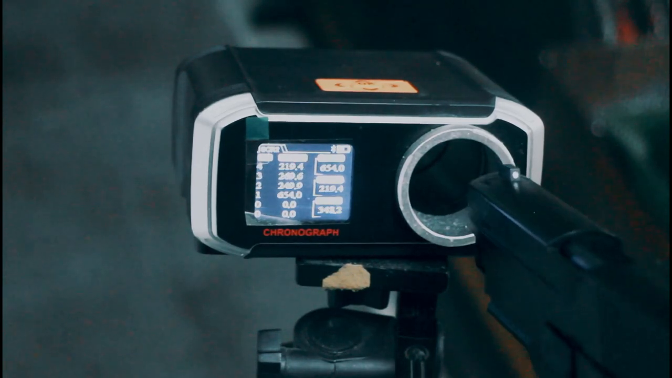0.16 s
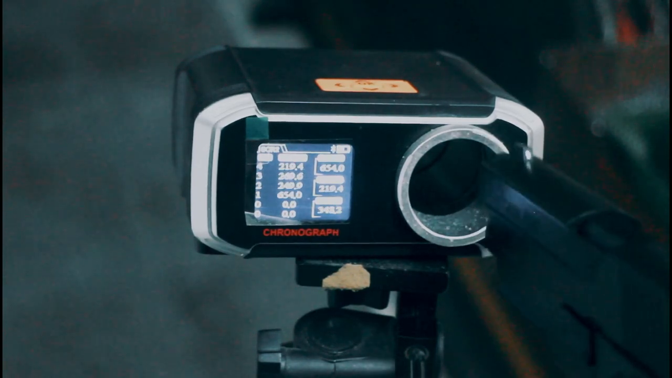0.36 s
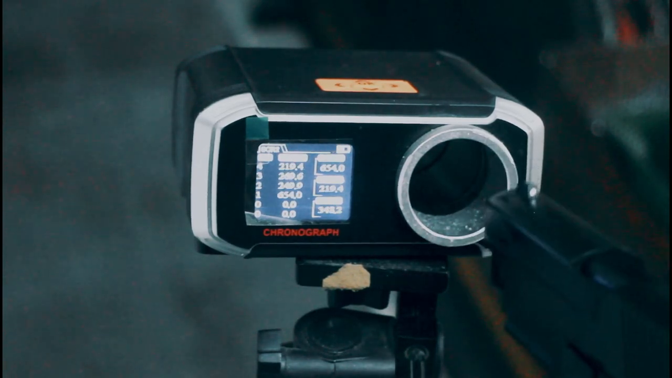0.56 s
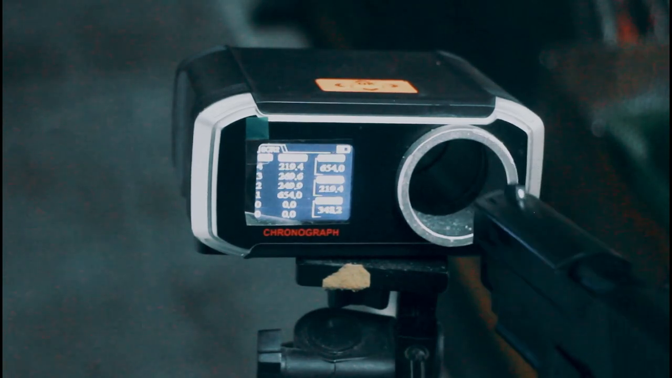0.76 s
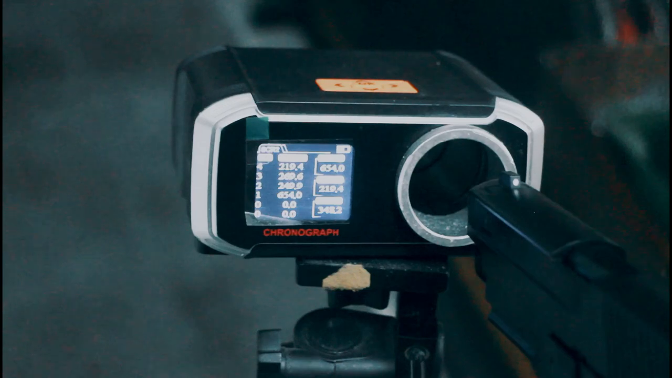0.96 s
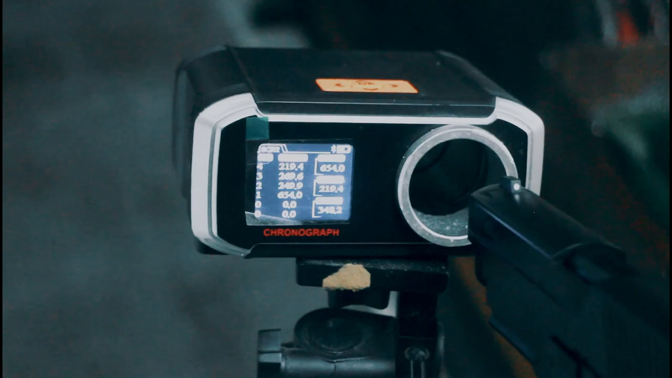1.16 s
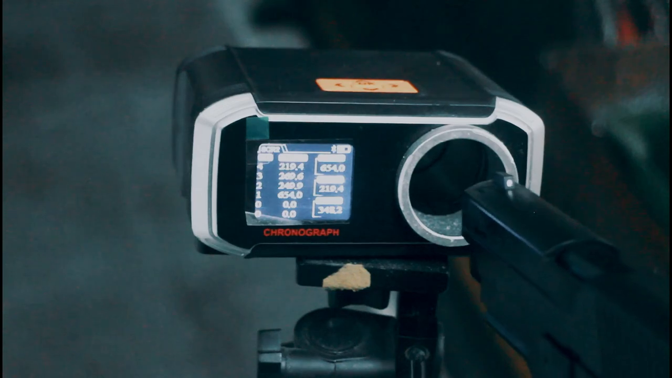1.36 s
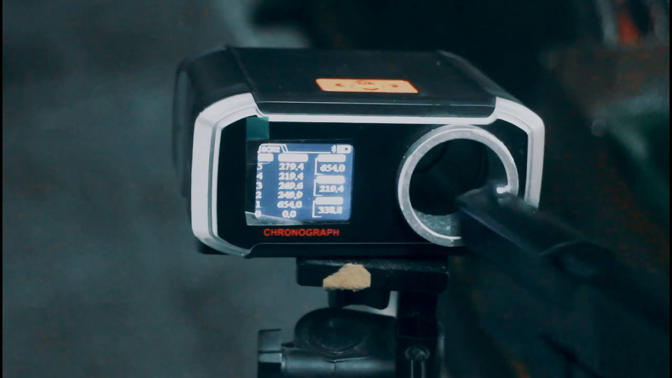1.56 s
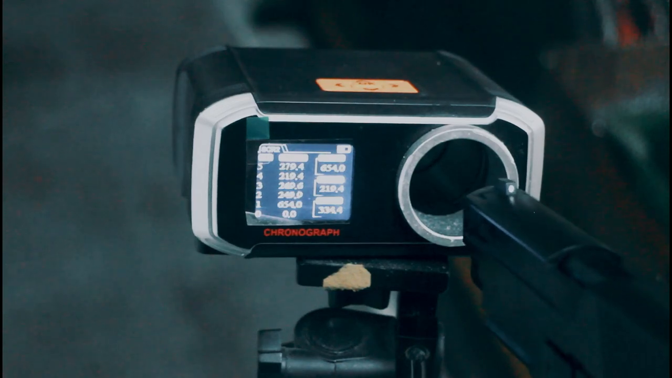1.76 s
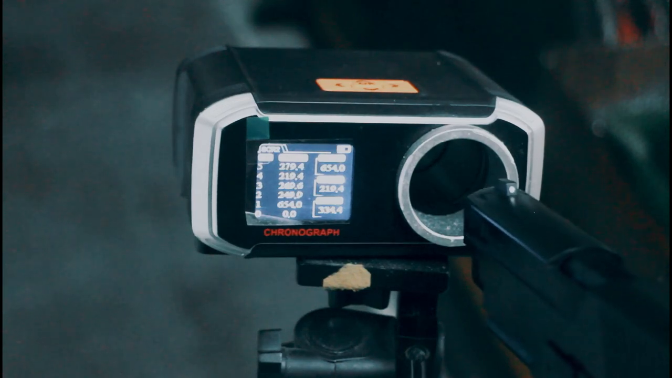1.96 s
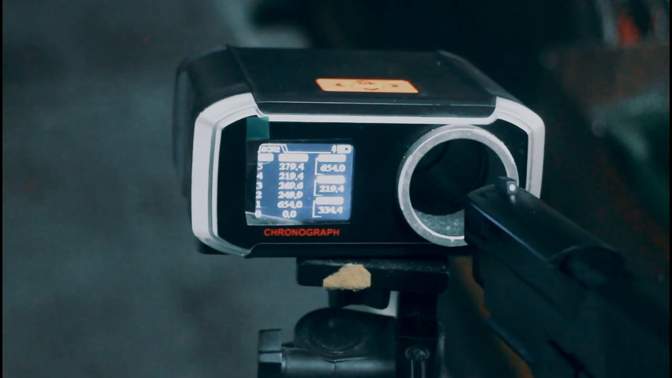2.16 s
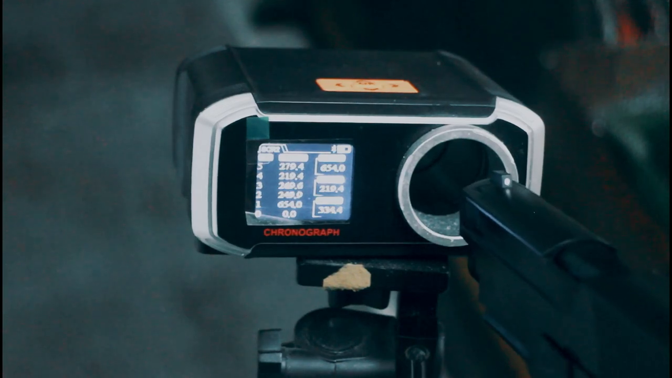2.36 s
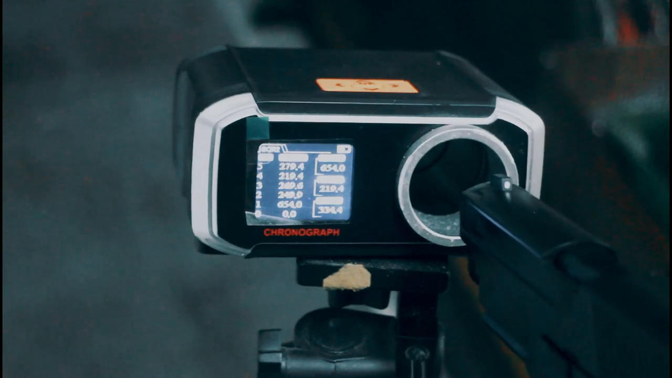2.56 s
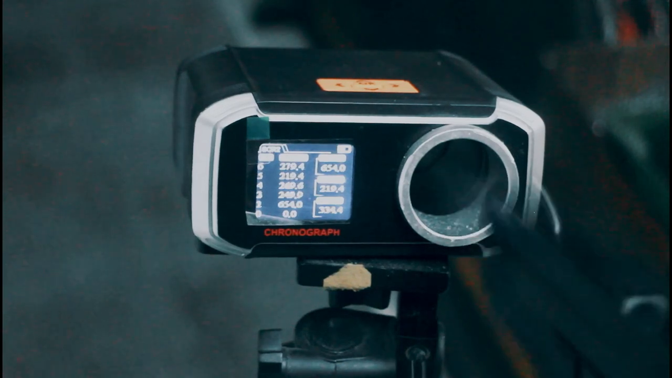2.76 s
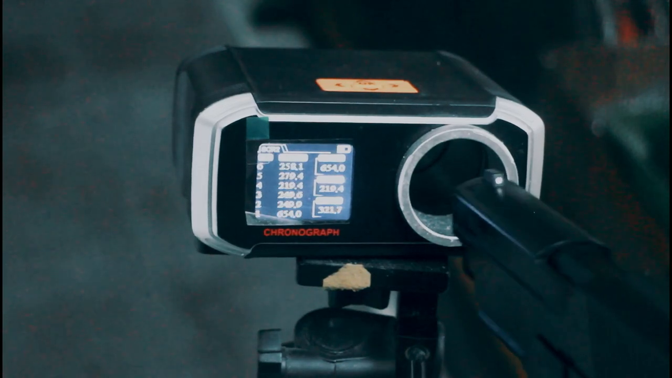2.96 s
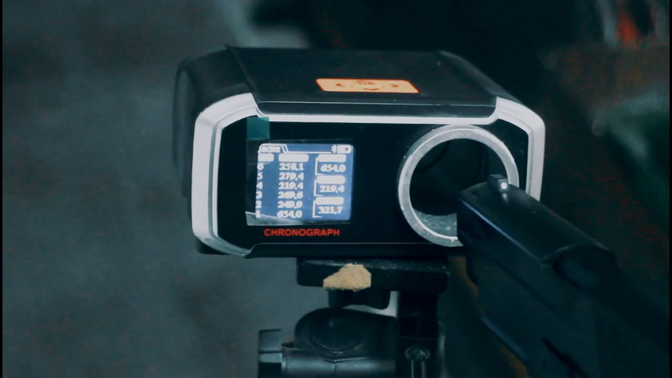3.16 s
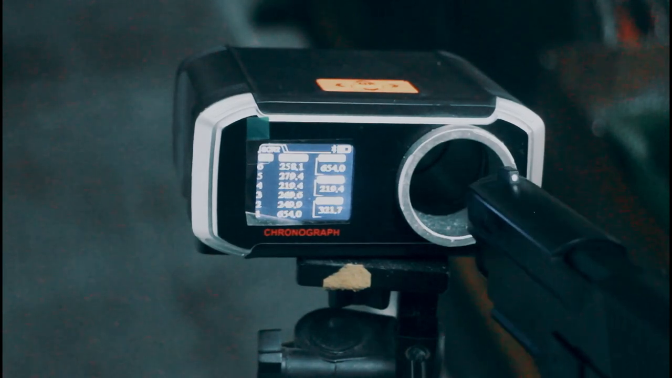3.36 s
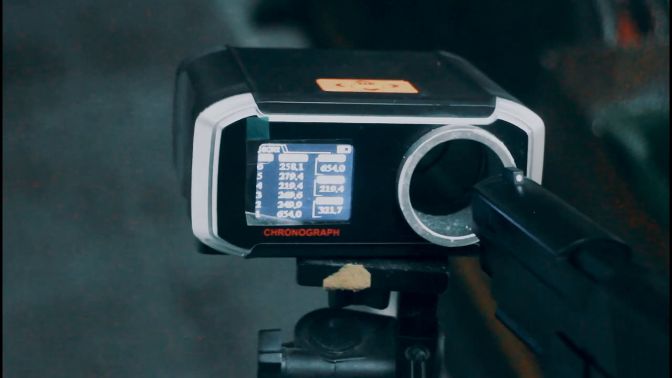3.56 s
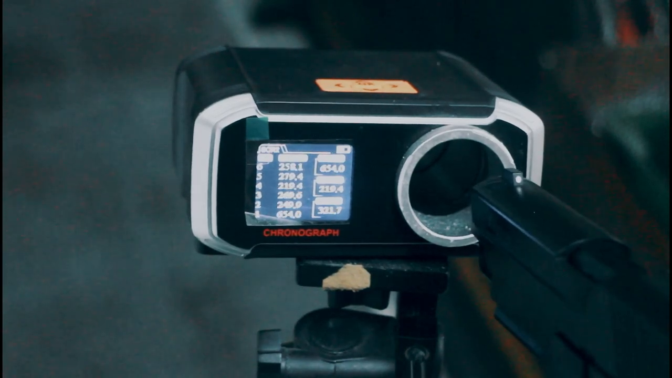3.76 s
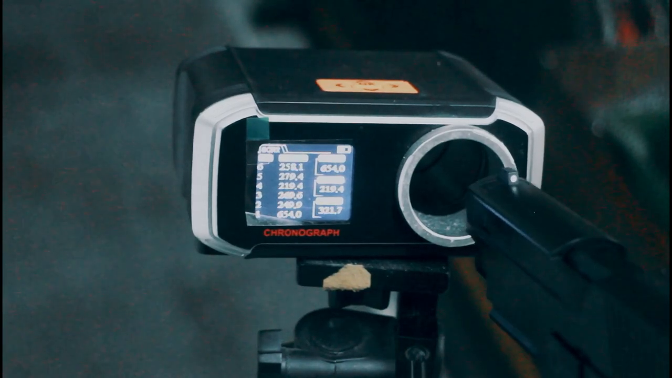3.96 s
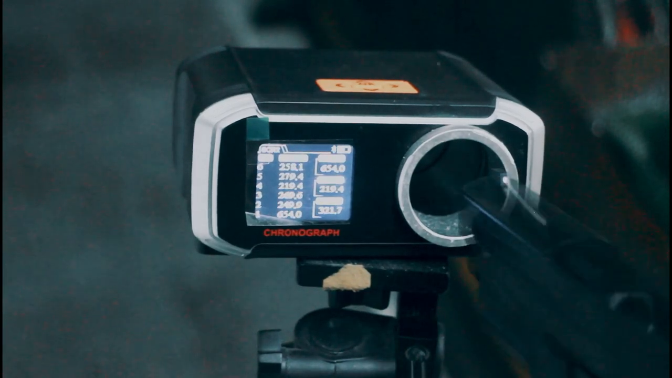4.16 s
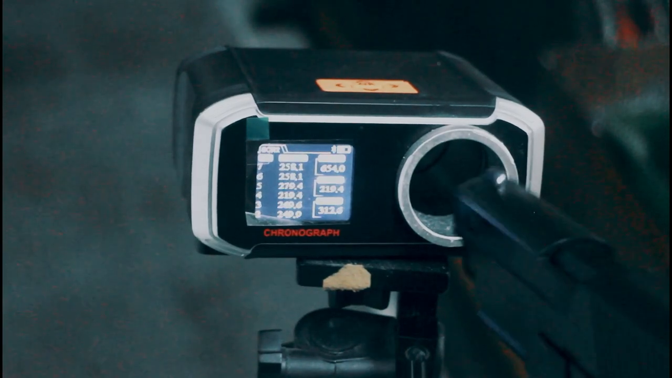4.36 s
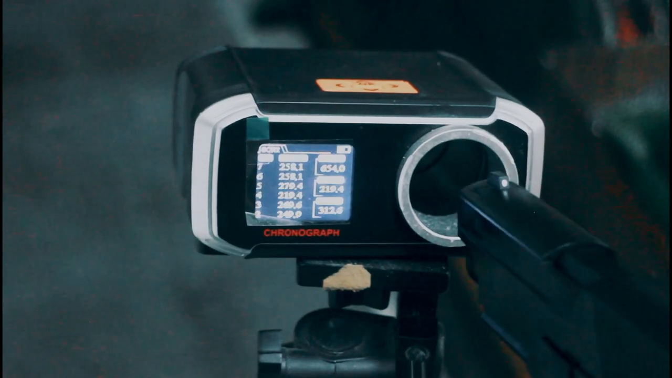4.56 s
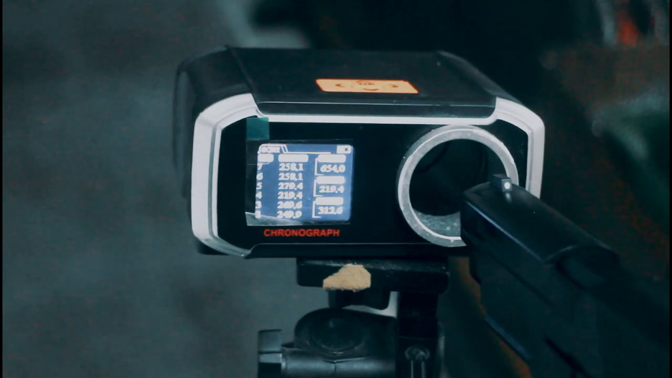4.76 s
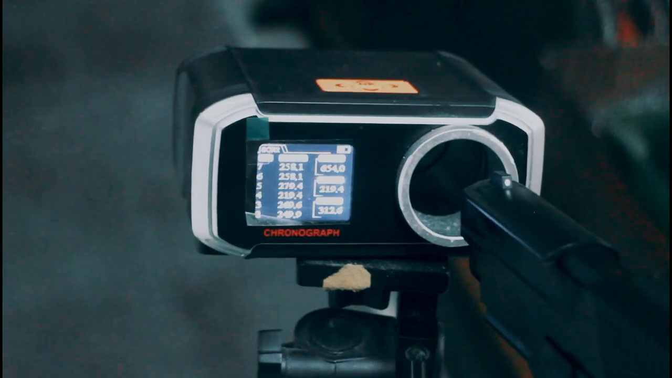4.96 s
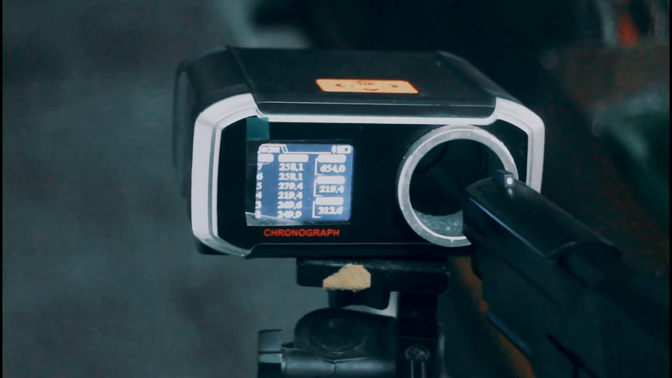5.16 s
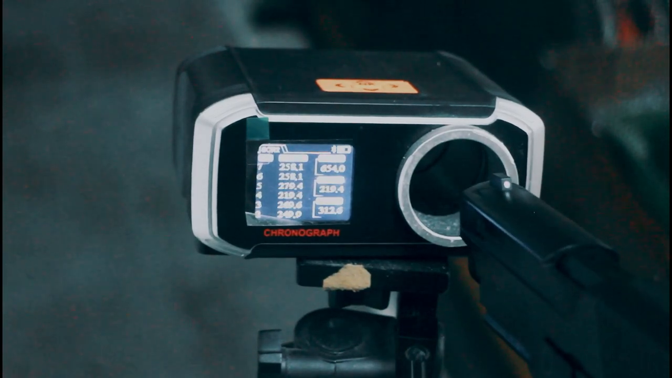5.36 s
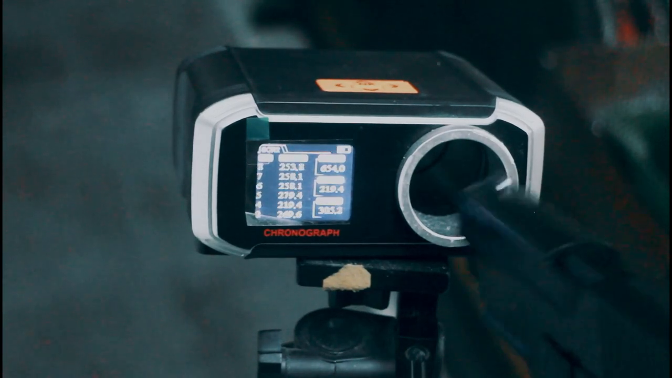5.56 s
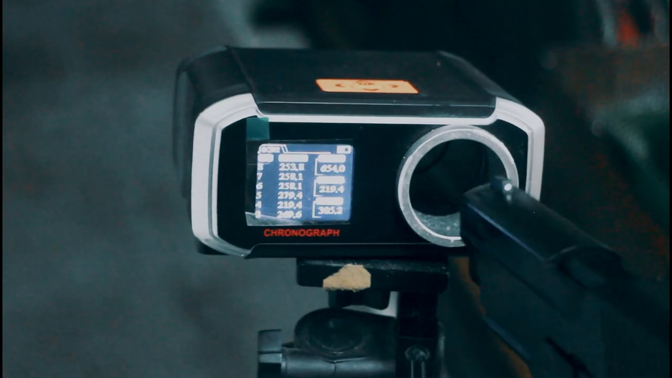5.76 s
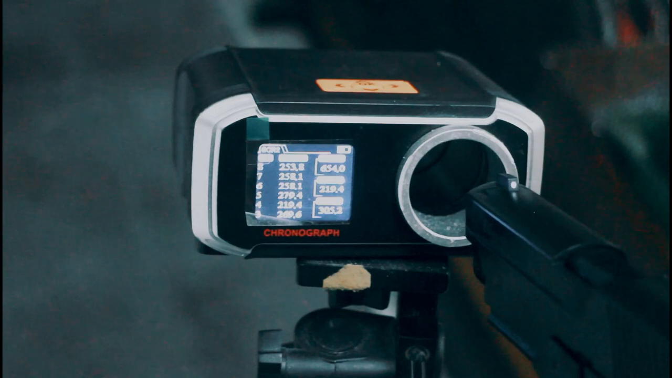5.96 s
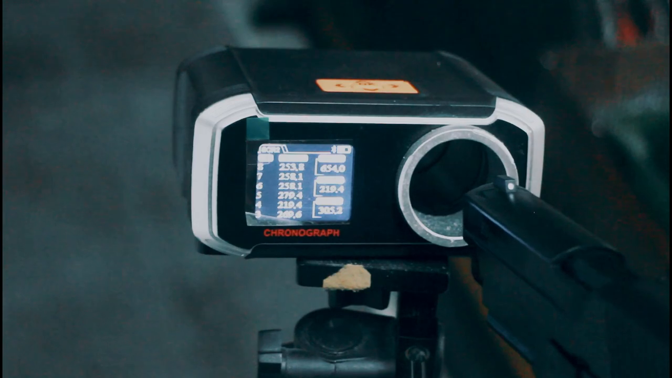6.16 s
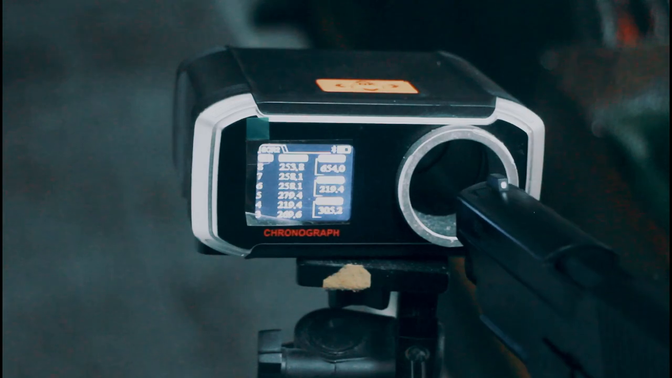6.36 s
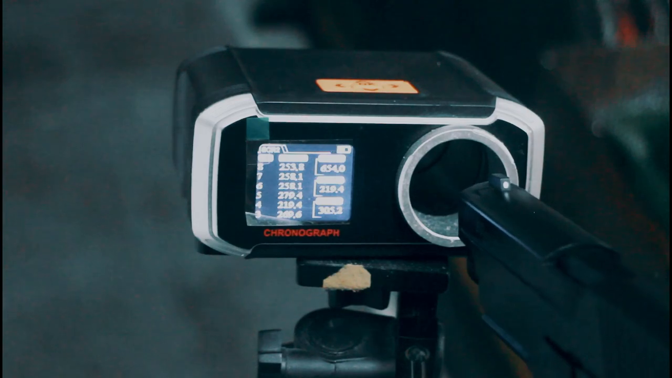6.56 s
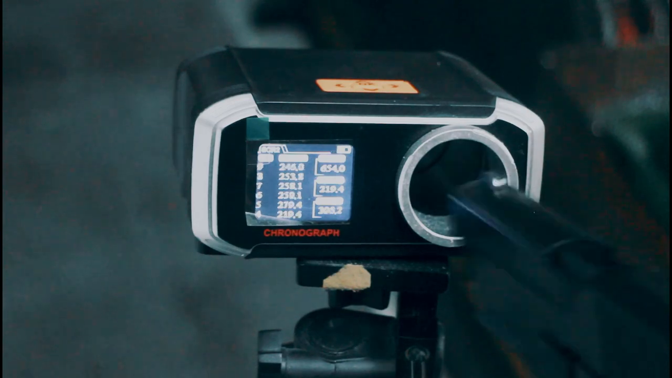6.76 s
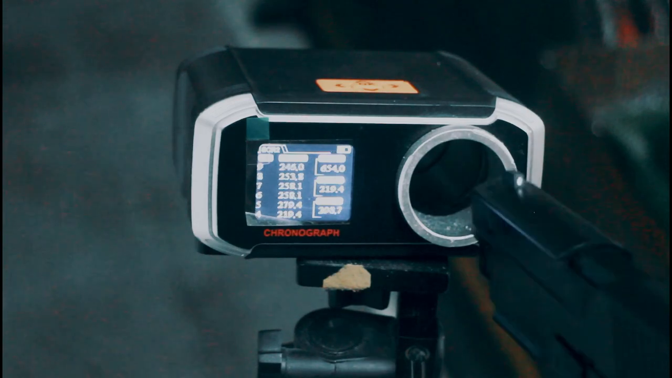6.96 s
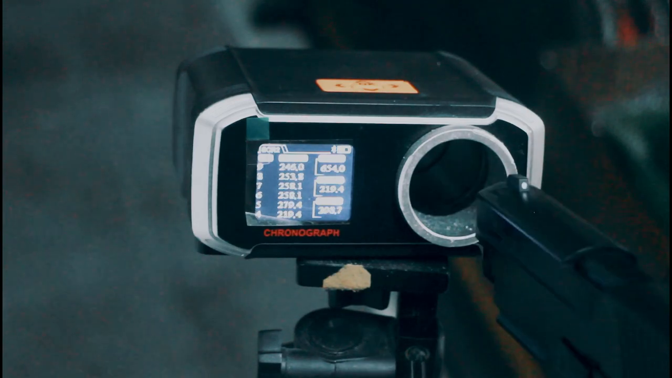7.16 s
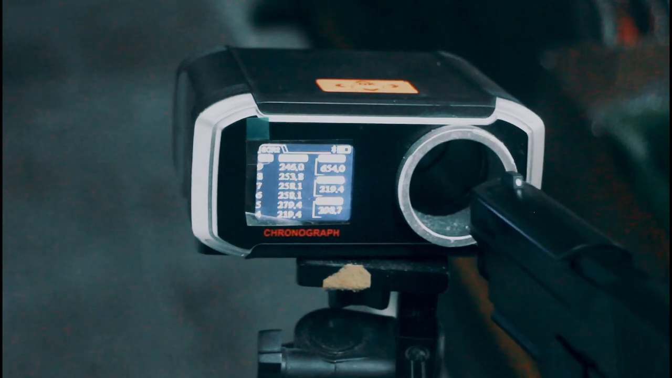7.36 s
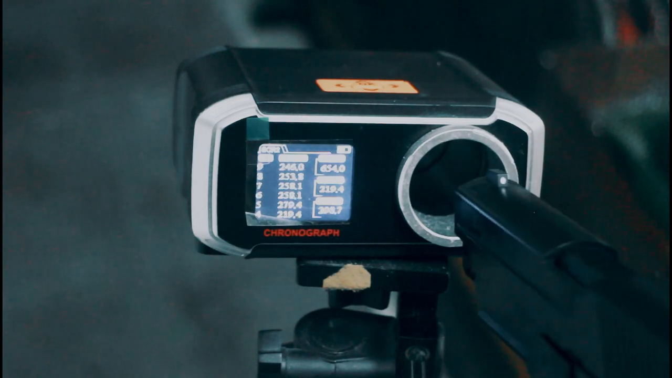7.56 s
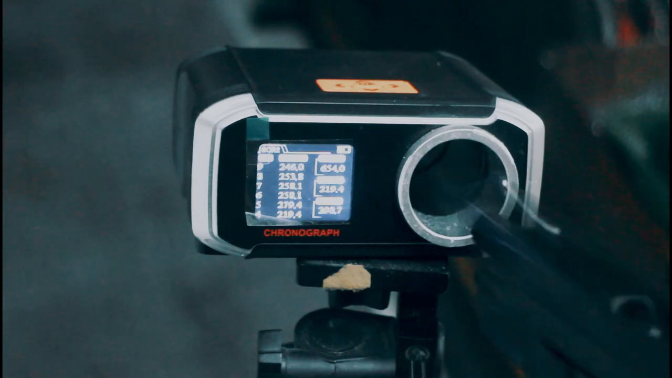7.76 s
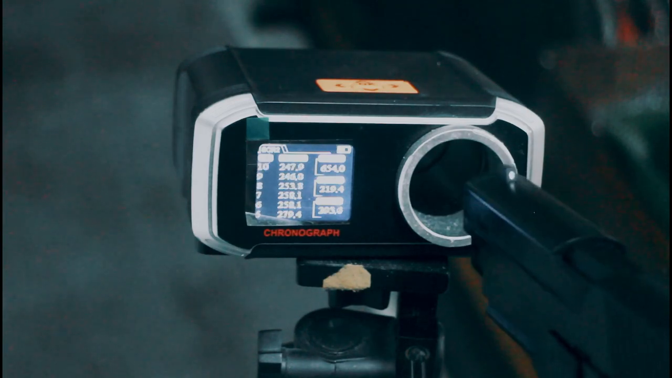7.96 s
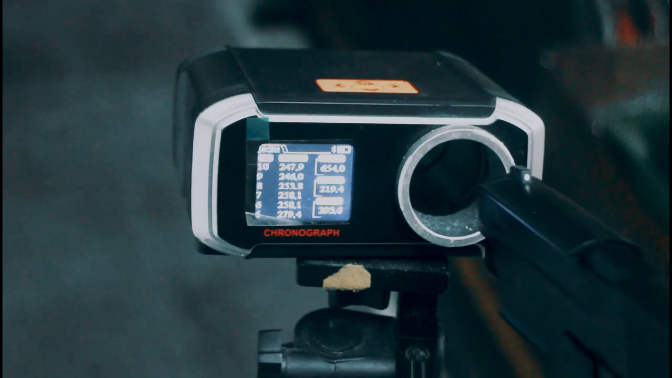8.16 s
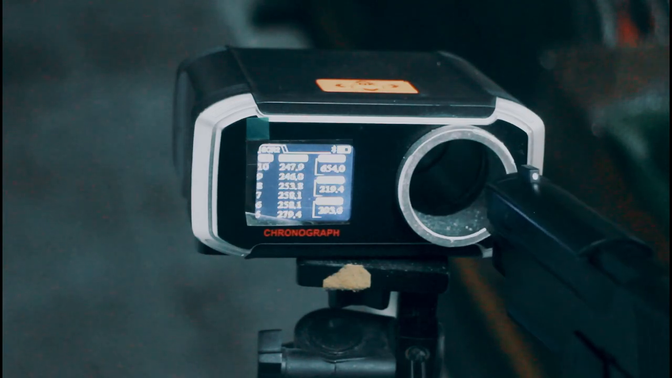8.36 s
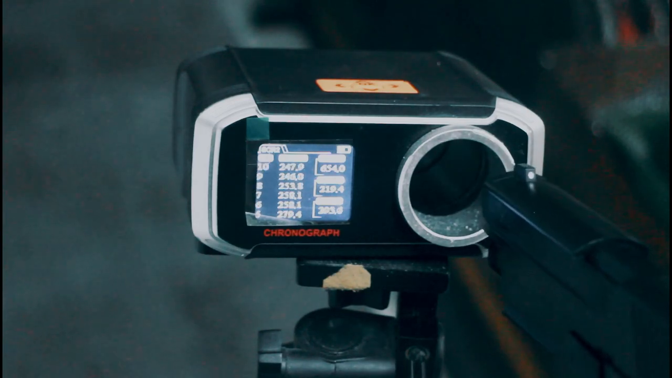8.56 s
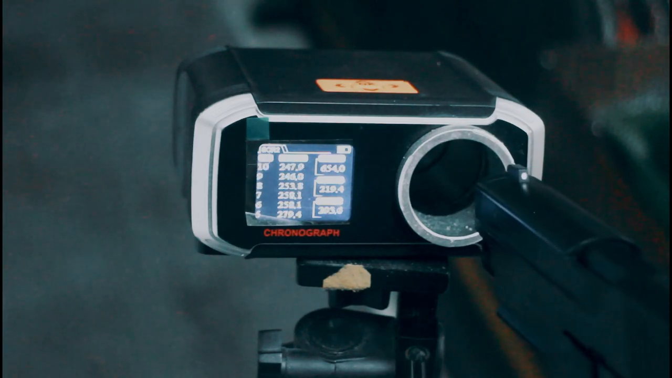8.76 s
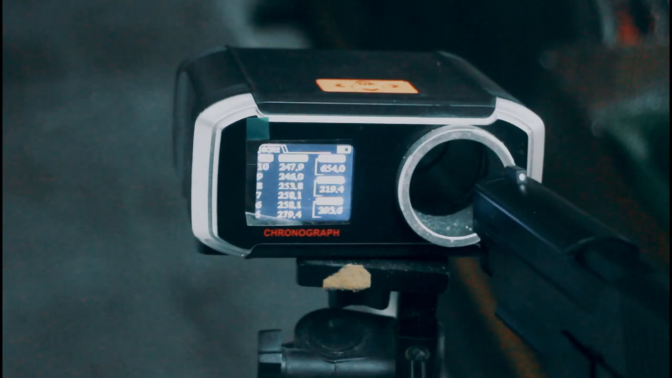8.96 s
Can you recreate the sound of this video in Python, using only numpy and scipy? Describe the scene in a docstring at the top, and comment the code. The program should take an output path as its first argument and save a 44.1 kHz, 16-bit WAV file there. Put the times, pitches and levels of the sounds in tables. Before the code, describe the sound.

Six loud cracks from a gas toy pistol echo in a hall, with faint ticks between the steady single shots.

```python
"""A gas blowback toy pistol, fired six times at a steady pace in a bare hall, close to a small stereo recorder.
Each shot is a valve hiss, a muzzle blast, then the slide hitting its rear stop and slamming home.
The hall rings for a second; at the start, the tail of an earlier shot is still dying away.
The blasts overload the recorder, whose gain control ducks and recovers.
Between shots: small trigger ticks, one hollow knock nearby, and a low murmur of ventilation."""
import sys
import numpy as np
from scipy import signal
from scipy.io import wavfile

SR = 44100
rng = np.random.default_rng(int(sys.argv[2]) if len(sys.argv) > 2 else 0)


def store_pcm(level_fs):
    """Save levels as 16-bit WAV."""
    pcm = np.round(np.clip(level_fs, -1, 1) * 32767).astype(np.int16)
    wavfile.write(sys.argv[1], SR, np.atleast_2d(pcm).T)


N = 396459

# Room tone. Each row: frequency in Hz, relative level per Hz in dB.
ROOM_TONE_SPECTRUM = [(15, -55), (25, -26), (64, -17.5), (137, -7), (165, -10), (269, -7.5), (403, -8),
                      (750, -6.5), (814, -6), (907, -7), (1430, -10.5), (2150, -16.5), (2330, -14.5),
                      (3060, -19.5), (15900, -29)]
# How alike the two capsules hear room tone and hall. Each row: frequency in Hz, correlation from -1 to 1.
ROOM_TONE_LIKENESS = [(60, 0.28), (130, 0.29), (290, 0.45), (640, -0.42), (1410, 0.12), (3100, -0.07),
                      (6820, -0.32), (15000, -0.53)]
HALL_CORRELATION = [(60, 0.95), (290, 0.98), (640, 0.99), (1410, .88), (3100, 0.75), (6820, .8),
                    (10000, 0.32), (11500, -.4), (15000, -.4)]
# Room tone and hall lean to the left. Each row: frequency in Hz, left minus right in dB.
LEFT_LEAN = [(60, 5), (110, 0.5), (200, 1), (380, 3), (700, 2.5), (1290, 2), (2380, 0.5), (4400, 0.0),
             (8120, 0), (15000, 2)]
# The hall's decay. Each row: frequency in Hz, seconds to fall 60 dB.
HALL_DECAY = [(100, 0.8), (260, 0.86), (700, 1.027), (1840, 1.051), (4850, 0.86), (10000, 0.68),
              (14000, .45)]
# The hall's colour. Each row: frequency in Hz, relative level per Hz in dB.
HALL_SPECTRUM = [(60, -31), (130, -21), (270, -6), (520, -1.5), (850, -1.5), (1400, -4), (2000, -3),
                 (3000, -3.5), (5200, -6.5), (6500, -7.5), (9000, -8.5), (10500, -12), (11700, -19.5),
                 (15000, -12)]
# Resonances of the hollow thing, the pistol's metal, its muzzle, and its tones in the hall's tail.
# Each row: frequency in Hz, width in Hz, relative gain in dB.
HOLLOW_MODES = [(268, 100, -7.5), (456, 68, 8), (654, 110, -1.5), (1230, 170, 1.5), (4270, 690, -5),
                (8000, 1800, -11)]
METAL_MODES = [(527, 840, -7.5), (1060, 480, -8), (1400, 350, 0), (2420, 650, -0.5), (3600, 1100, -3.5),
               (5200, 1100, -5), (6100, 940, -8), (9500, 4800, -8)]
MUZZLE_MODES = [(284, 360, -17.5), (730, 260, -4.5), (1369, 370, -8), (2160, 210, -3.5), (3450, 870, -8),
                (5000, 700, -3.5), (5454, 490, -2.5), (6403, 950, -8), (8400, 560, -6.5),
                (9240, 1200, -8.5), (15800, 3100, -14)]
TAIL_MODES = [(1405, 370, 4.5), (3520, 350, -5.5), (5200, 490, 0.5), (8140, 400, -5), (9400, 750, -1.5)]
# A dull knock and its bounce. Each row: start in seconds, level in dB before the dulling.
KNOCK_BLOWS = [(.462, -20.5), (0.472, -34)]
# Small ticks: trigger and grip contacts, plus the bright edge of the knock's bounce at 0.473 s.
# Each row: start in seconds, level in dB before the dulling, centre in Hz, fall one octave off in dB.
SMALL_TICKS = [(0.015, -37.5, 3000, 18), (0.473, -51, 6000, 9), (0.944, -46.5, 1002, 25.5),
               (2.252, -39, 1670, 14), (2.268, -47.5, 1307, 2), (3.544, -43.5, 599, 13),
               (5.016, -55.5, 2490, 1.5), (6.3276, -49, 2010, 2), (7.497, -48, 1780, 1.5),
               (7.586, -52, 2600, 2), (7.591, -38, 2560, 7.5), (7.608, -47, 2603, 8.5),
               (8.596, -52.5, 3000, 2.5), (8.7242, -57.5, 2485, 2.1), (8.767, -52, 3000, -1)]
# The slide rebounds at its rear stop after the blast, and chatters after slamming home.
# Each row: delay in seconds, level in dB (chatter: added to the slam's chatter level),
# brightness in dB per octave, decay time in seconds.
REAR_STOP_HITS = [(.0108, -7, 3, .0017), (0.0125, -7.5, 1.5, 0.0013), (.0185, -11, 5.5, .002)]
CHATTER_HITS = [(.0056, 0, -1, 0.0021), (.009, -5, -2, .003), (0.0127, -6.5, -1.5, .003),
                (0.018, -7.5, 0.5, .003)]
# The slide slams home. Each row: start in seconds, level in dB, brightness in dB per octave,
# chatter level in dB.
SLIDE_SLAMS = [(1.5741, -0.5, 2, -4.5), (2.857, -13.5, 3, -4.5), (4.2937, -4.5, -0.5, -9.5),
               (5.5461, -4, -0.3, -8.5), (6.7785, -7, 0.4, -9.5), (7.8879, -7, -0.7, -9)]
# Muzzle blasts; the first is heard only as a tail. Each row: start in seconds, level in dB, brightness
# in dB per octave, then for the hall: level in dB, brightness in dB per octave, bass in dB, ring in dB.
BLASTS = [(-.52, 9, .1, -3, 2.5, 18, -10), (1.5301, 4.87, 0.4, -6.5, 1.1, 6, -7),
          (2.811, 2.47, -.18, -7, 0.28, 0.6, -14.5), (4.2471, 3.5, .02, -8.5, -0.64, -5, 0.5),
          (5.4981, 2, .09, -8.5, -0.069, -6, -3.1), (6.7296, 1.84, 0.27, -11, 1, 4, -0.5),
          (7.8392, 2, 0.57, -9.5, -0.25, -3, -2)]

BAND_CENTRES_HZ = 32 * 2 ** (np.arange(28) / 3)
ROOM_TONE_DB = -57.5
HALL_BUILD_S, HALL_BASS_HZ = 0.0017, 450
SLIDE_SEND_DB, TICK_SEND_DB, KNOCK_SEND_DB = -13.5, -11.5, -9   # into the hall
HUM_DB, HUM_DECAY_S, HUM_DB_PER_OCTAVE = -9, 0.085, -5   # after the knock
UNEVEN_S, UNEVEN_DB, SLAM_DECAY_S = .0004, 1.5, .0013   # slide contacts
MIC_ROLL_HZ, MIC_EDGE_HZ, ABOVE_EDGE_DB = 10800, 10700, -12.5
DUCK_ABOVE_DB, RECOVERY_DB_PER_S, SENSE_S, ATTACK_S = -10.5, 73.5, 0.0027, 0.00086
LOW_CUT_HZ, HIGH_CUT_HZ = 60, 15700


def from_db(db):
    """Decibels to gain."""
    return 10 ** (np.asarray(db) / 20)


def at_hz(table, hz):
    """A table read on a log-frequency axis."""
    table_hz, values = np.transpose(table)
    return np.interp(np.log(hz), np.log(table_hz), values)


def tilt(db_per_octave):
    """A colour in dB that slopes evenly with pitch, level at 2 kHz."""
    return lambda hz: db_per_octave * np.log2(hz / 2000)


def bell(centre_hz, fall_db):
    """A colour in dB that falls away on both sides of a centre."""
    return lambda hz: -max(fall_db, 0) * np.log2(hz / centre_hz) ** 2


def filtered(x, order, hz, kind="low"):
    """A flat-topped filter, low-pass by default."""
    return signal.sosfilt(signal.butter(order, hz, kind, fs=SR, output="sos"), x)


def smoothed(x, lag_s):
    """A one-pole lag."""
    pole = np.exp(-1 / (lag_s * SR))
    return signal.lfilter([1 - pole], [1, -pole], x)


def resonance(x, hz, width_hz):
    """A two-pole resonance with gain 1 at its peak."""
    r = np.exp(-np.pi * width_hz / SR)
    return signal.lfilter([1, 0, -1], [1, -2 * r * np.cos(2 * np.pi * hz / SR), r * r], x) * (1 - r * r) / 2


def contact(decay_s):
    """The envelope of an impact: a quick rise and an exponential fall."""
    t = np.arange(3000) / SR
    return (1 - np.exp(-t / 0.00013)) * np.exp(-t / decay_s)


def add_burst(out, start_s, level_db, colour, envelope, modes):
    """A burst of noise rings a body's modes; it carries the energy of 3 ms at the given level."""
    push = envelope * rng.standard_normal(len(envelope))
    sound = sum((-1) ** k * from_db(peak_db + colour(hz)) * resonance(push, hz, width_hz)
                for k, (hz, width_hz, peak_db) in enumerate(modes))
    i = round(start_s * SR)
    out[i:i + len(sound)] += from_db(level_db) * sound / np.sqrt(np.sum(sound ** 2) / 132)


def diffuse_bands(likeness):
    """Sound from all round at the two capsules: third-octave bands of partly alike stereo noise."""
    white = rng.standard_normal((2, 2, N))   # neighbouring bands get unrelated noise
    for k, hz in enumerate(BAND_CENTRES_HZ):
        mid, side = filtered(white[k % 2], 2, [hz / 2 ** (1 / 6), hz * 2 ** (1 / 6)], "band")
        alike = at_hz(likeness, hz)
        lean = from_db(at_hz(LEFT_LEAN, hz) / 2 * np.array([[1], [-1]]))
        yield hz, lean * (np.sqrt(1 + alike) * mid + np.sqrt(1 - alike) * side * [[1], [-1]])


def room_tone():
    """Steady ventilation murmur and microphone hiss."""
    noise = sum(from_db(at_hz(ROOM_TONE_SPECTRUM, hz)) * band
                for hz, band in diffuse_bands(ROOM_TONE_LIKENESS))
    return from_db(ROOM_TONE_DB) * noise / np.sqrt(np.mean(noise ** 2))


def hall(slide):
    """Diffuse reflections off bare walls: each sound adds power that builds up, then dies band by band."""
    centres = BAND_CENTRES_HZ
    bass = 1 / (1 + (centres / HALL_BASS_HZ) ** 2)
    sent = [(s, db + tilt(slope)(centres) + bass_db * bass) for s, *_, db, slope, bass_db, _ in BLASTS]
    sent += [(s, db + SLIDE_SEND_DB + tilt(slope)(centres)) for s, db, slope, _ in slide]
    sent += [(s, db + TICK_SEND_DB + bell(hz, fall)(centres)) for s, db, hz, fall in SMALL_TICKS]
    sent += [(s, db + KNOCK_SEND_DB + bell(centre_hz=577, fall_db=4)(centres)) for s, db in KNOCK_BLOWS]
    starts_s, spectra_db = map(np.array, zip(*sent))
    grid = np.arange(0, N + 44, 44)   # about every millisecond
    age_s = np.maximum(grid / SR - starts_s[:, None], 0)
    build = (1 - np.exp(-age_s / HALL_BUILD_S)) ** 2
    tail = 0
    for start_db, (hz, band) in zip(spectra_db.T, diffuse_bands(HALL_CORRELATION)):
        level_db = start_db[:, None] + at_hz(HALL_SPECTRUM, hz) - 60 * age_s / at_hz(HALL_DECAY, hz)
        power = np.sum(build * from_db(2 * level_db), axis=0)
        tail = tail + np.interp(np.arange(N), grid, np.sqrt(power)) * band
    return tail + tail_ring(tail)


def tail_ring(tail):
    """The pistol's tones colour the hall's tail, no two shots alike."""
    starts_s, *_, ring_db = np.transpose(BLASTS)
    latest_shot = np.searchsorted(starts_s, np.arange(N) / SR) - 1
    uneven_db = 1.5 * rng.standard_normal((len(BLASTS), len(TAIL_MODES)))
    ring = sum(from_db(peak_db + uneven_db[latest_shot, k]) * resonance(tail, hz, width_hz)
               for k, (hz, width_hz, peak_db) in enumerate(TAIL_MODES))
    return from_db(ring_db[latest_shot]) * ring


def knock():
    """Something hollow is bumped near the microphone; the soft contact dulls the blow, then it hums on."""
    blow, hum = np.zeros((2, N))
    fade = np.exp(-np.arange(SR // 2) / SR / HUM_DECAY_S)
    for s, level_db in KNOCK_BLOWS:
        add_burst(blow, s, level_db, tilt(0), contact(decay_s=0.00077), HOLLOW_MODES)
        add_burst(hum, s, level_db + HUM_DB, tilt(HUM_DB_PER_OCTAVE), fade, HOLLOW_MODES)
    return filtered(blow, 2, hz=1000) + hum


def small_ticks():
    """Trigger and grip contacts, plus the bright edge of the knock's bounce; narrower ticks are duller."""
    out = np.zeros(N)
    for s, level_db, hz, fall_db in SMALL_TICKS:
        tick, i = np.zeros(3000), round(s * SR)
        add_burst(tick, 0, level_db, bell(hz, fall_db), contact(decay_s=.005), METAL_MODES)
        top_hz = hz * 2 ** np.sqrt(8 / max(fall_db, 1))   # roll off where the bell is 8 dB down
        out[i:i + len(tick)] += filtered(tick, 2, min(top_hz, SR / 3))
    return out


def slide_contacts():
    """The slide's hits, a little uneven. Each row: start in seconds, dB, dB per octave, decay in seconds."""
    hits = [(s + delay, *rest) for s, *_ in BLASTS[1:] for delay, *rest in REAR_STOP_HITS]
    hits += [(s + delay, chatter_db + db, *rest)
             for s, *_, chatter_db in SLIDE_SLAMS for delay, db, *rest in CHATTER_HITS]
    chance = rng.standard_normal((len(hits), 2))
    hits = [(s + UNEVEN_S * late, db + UNEVEN_DB * hard, *rest)
            for (s, db, *rest), (late, hard) in zip(hits, chance)]
    return hits + [(s, db, slope, SLAM_DECAY_S) for s, db, slope, _ in SLIDE_SLAMS]


def pistol(slide):
    """The shots at close range: gas rings the muzzle, the slide rings the metal."""
    out, t = np.zeros(N), np.arange(3000) / SR
    hiss = (t < .008) * np.exp(np.minimum(t, .008) / 0.0049)   # gas starts to pass the valve
    hammer = (t < .0022) * 1.   # the hammer meets the valve
    blast = np.exp(-(t / 0.0025) ** 4) + 0.15 * np.exp(-t / 0.0073)   # a short jet, then the barrel empties
    rattle = np.exp(-t / 0.0089)   # spring and slide on the way back
    for s, level_db, slope, *_ in BLASTS[1:]:
        add_burst(out, s - .008, level_db - 28, tilt(-1.6), hiss, MUZZLE_MODES)
        add_burst(out, s - .0022, level_db - 17, tilt(-4.1), hammer, MUZZLE_MODES)
        add_burst(out, s, level_db, tilt(slope), blast, MUZZLE_MODES)
        add_burst(out, s + .003, level_db - 5, tilt(.1), rattle, METAL_MODES)
    for s, level_db, slope, decay_s in slide:
        add_burst(out, s, level_db, tilt(slope), contact(decay_s), METAL_MODES)
    return out


def scene():
    """At the microphone: the close sounds, widened by one near reflection, with hall and room tone behind."""
    slide = slide_contacts()
    close = filtered(pistol(slide) + small_ticks() + knock(), 4, MIC_ROLL_HZ)
    reflection = np.diff(np.roll(close, 25), 2, prepend=[0, 0])   # small surfaces return mostly treble
    wide = close + 0.54 * reflection * [[1], [-1]]   # it reaches the capsules in opposite sense
    direct = wide * from_db([[.4], [-.4]])
    far = hall(slide)
    # Past its treble edge the capsule hears the hall fainter.
    far = filtered(far, 8, MIC_EDGE_HZ) + from_db(ABOVE_EDGE_DB) * filtered(far, 8, MIC_EDGE_HZ, "high")
    return direct + far + room_tone()


def record(dry):
    """The recorder: its gain control ducks too late, so the blast clips, then climbs back steadily."""
    capsule = dry - 0.55 * resonance(dry, hz=11200, width_hz=570)   # a narrow treble dip
    level_db = 10 * np.log10(smoothed(np.mean(capsule ** 2, axis=0), SENSE_S) + 1e-12)
    climb_db = RECOVERY_DB_PER_S * np.arange(N) / SR
    held_db = np.maximum.accumulate(level_db + climb_db) - climb_db   # peaks let go at a steady rate
    duck_db = smoothed(np.maximum(held_db - DUCK_ABOVE_DB, 0), ATTACK_S)
    clipped = np.clip(capsule * from_db(-duck_db), -1, 1)
    thinned = filtered(clipped, 1, LOW_CUT_HZ, "high")
    high_cut = signal.ellip(10, .3, 60, HIGH_CUT_HZ, fs=SR, output="sos")
    return np.clip(signal.sosfilt(high_cut, thinned), -1, 1)


dry = scene()
out = record(dry)
store_pcm(out)
```